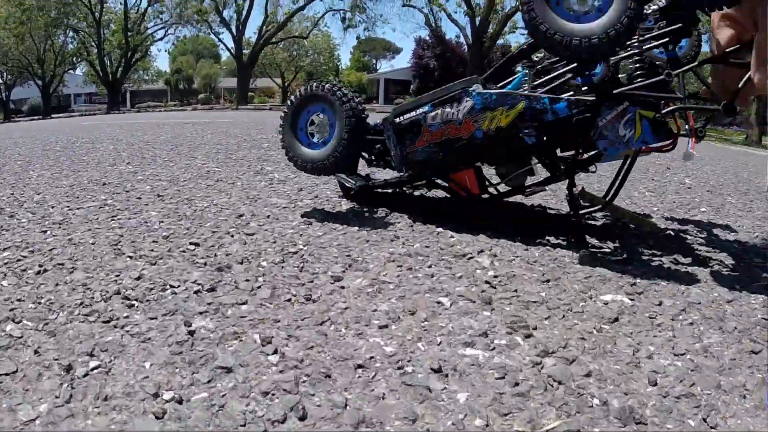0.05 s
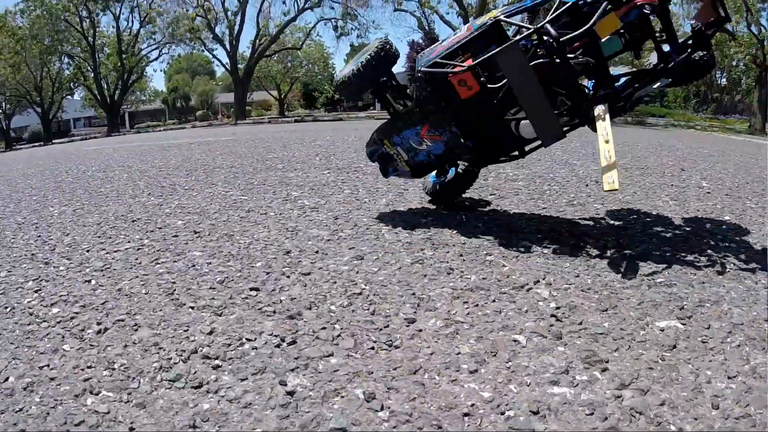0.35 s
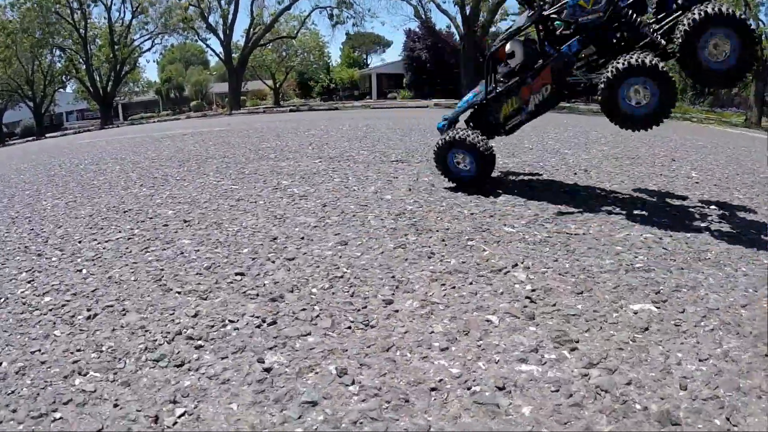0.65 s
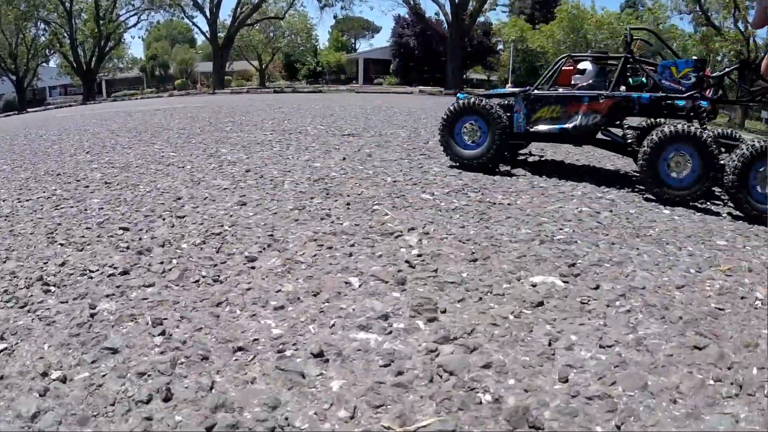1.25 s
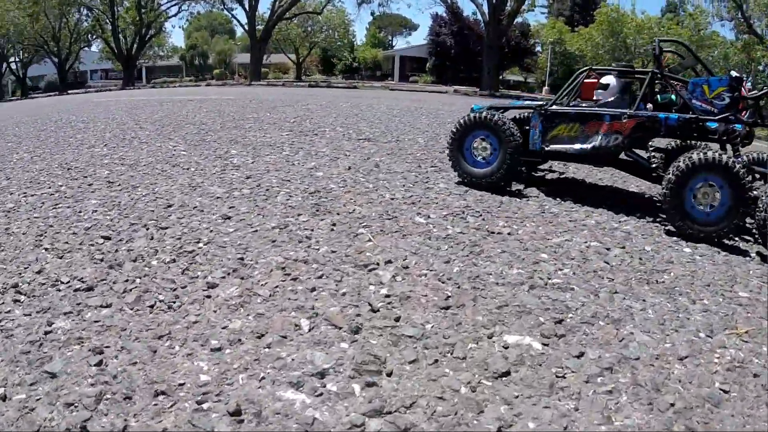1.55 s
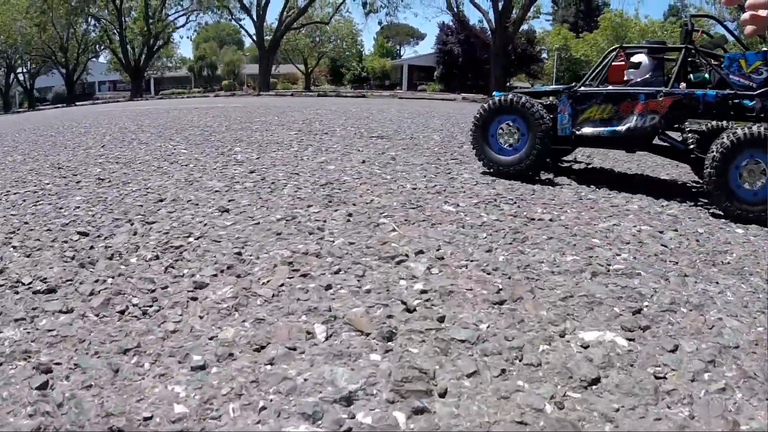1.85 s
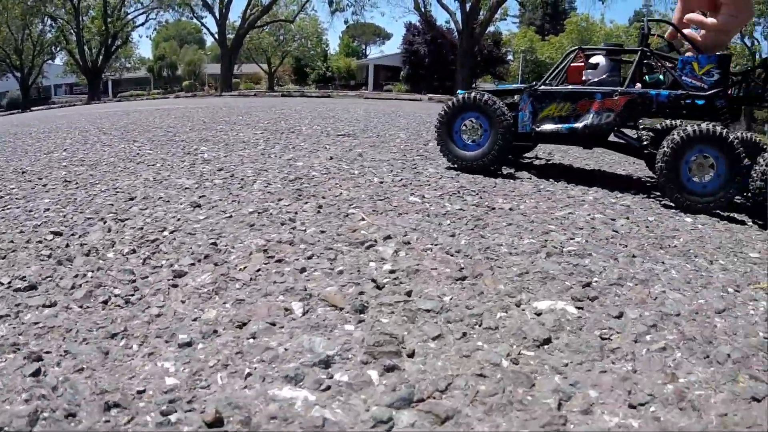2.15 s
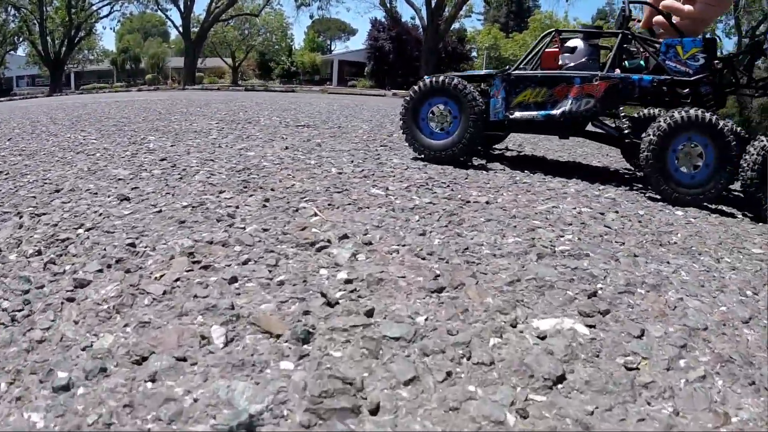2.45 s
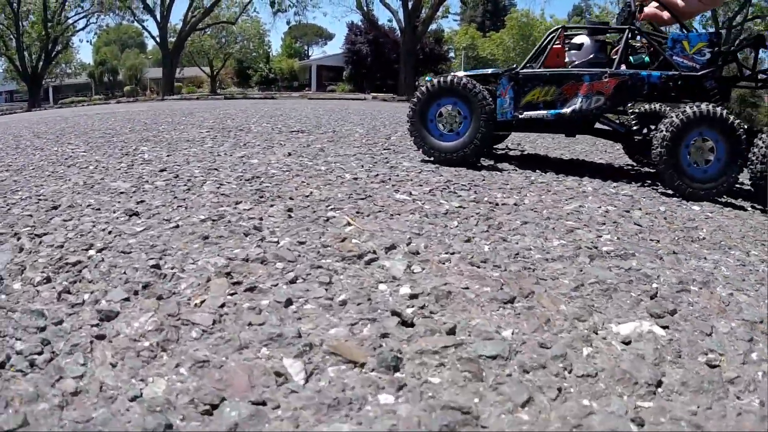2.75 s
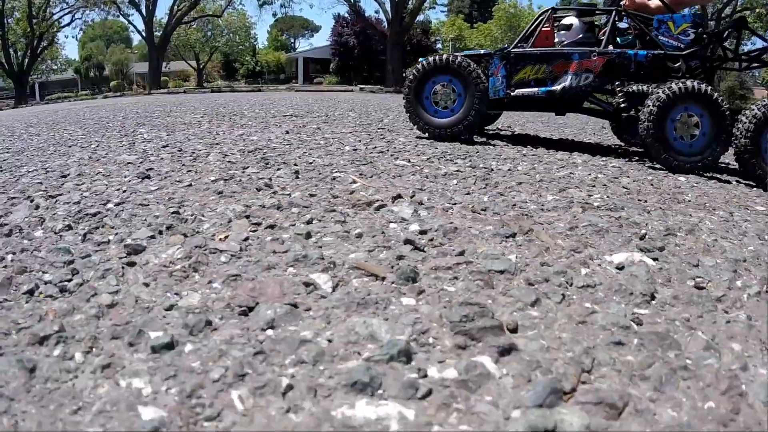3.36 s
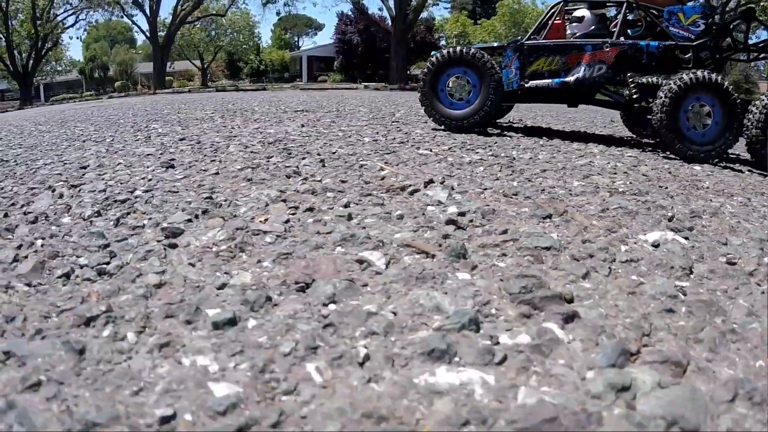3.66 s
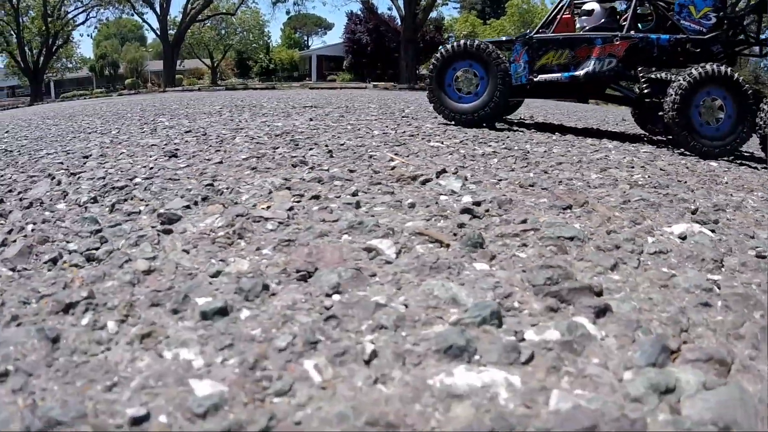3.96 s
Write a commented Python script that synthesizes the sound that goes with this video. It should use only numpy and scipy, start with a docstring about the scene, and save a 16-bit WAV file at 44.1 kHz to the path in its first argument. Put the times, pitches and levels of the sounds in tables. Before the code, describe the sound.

Close to a microphone on the ground outdoors, a toy truck knocks and rattles off its roof, lands on its wheels and crunches on grit. After one dull thump, easing wind and far street traffic remain.

```python
"""Outdoors on asphalt, microphone on a camera at ground level, a toy truck close by.
From the start, wind rumbles at the microphone over the steady wash of distant traffic.
The truck is dragged off its roof and turned over: its plastic body clatters, loose parts rattle.
Set on its wheels, it crunches on grit, and the suspension ticks as it settles. One dull thump
follows at 1.7 s; then a far car passes, and the truck gives a few last faint rubs and ticks."""
import sys
import numpy as np
from scipy import signal
from scipy.io import wavfile
from scipy.ndimage import uniform_filter1d

SR = 44100
rng = np.random.default_rng(int(sys.argv[2]) if len(sys.argv) > 2 else 0)


def to_wav(s):
    """Save 16-bit WAV."""
    ch = np.atleast_2d(s).T  # columns
    pcm = np.round(np.clip(ch, -1, 1) * 32767)  # PCM
    wavfile.write(sys.argv[1], SR, pcm.astype(np.int16))


N = 176400
T = np.arange(N) / SR
RING_T = T[:SR // 6]

# Far off: street drone, street wash, a car's tyre hum (frequency [Hz], relative density [dB])
DRONE_SPECTRUM = [(60, -36), (105, -35), (140, -3.5), (175, -1), (240, -3), (320, -12), (550, -21.5),
                  (15000, -120)]
WASH_SPECTRUM = [(200, -12.5), (400, -2.5), (600, -1.5), (1000, -1.5), (1500, -7), (2200, -16.5),
                 (3200, -24.5), (5200, -35), (8500, -35.5), (12000, -44.5), (15000, -52)]
CAR_SPECTRUM = [(520, -26.5), (840, 0), (1070, -2), (3200, -50.5)]
# Swell of the drone (time [s], level [dB])
DRONE_SWELL = [(0, -31), (1, -32), (1.9, -28), (3.2, -32.5)]
# Wind at the microphone (frequency [Hz], relative density [dB])
WIND_SPECTRUM = [(10, -34), (22, -3.5), (38, -1.5), (78, -1.5), (120, -5.5), (250, -18), (600, -23),
                 (15000, -110)]
# Its gusts (time [s], level [dB])
WIND_GUSTS = [(0, -24.5), (.27, -22), (.4, -27), (.6, -27.5), (.9, -32), (1.7, -35.5), (2.2, -32),
              (2.8, -38), (3.6, -49), (4, -40.5)]
# Dull bumps carried to the camera (time [s], level [dB], half width of the push [s])
CAMERA_BUMPS = [(0.2547, -15, 0.0016), (0.8635, -18, 0.00082), (1.7, -4.5, 0.00078), (1.718, -17.5, 0.0014)]
# Modes of the camera mount (frequency [Hz], relative level [dB], t60 [s])
MOUNT_MODES = [(115, -6, 0.029), (210, -8.5, .04), (506, -12, 0.014), (2320, -15, 0.0088)]
# Grit crushed on asphalt (frequency [Hz], relative level [dB])
GRIT_SPECTRUM = [(500, 9), (1500, 9.5), (2400, 3), (3050, 2), (4300, -3.5), (5200, -3.5), (6100, -4.5),
                 (7100, -8), (9300, -13.5), (12000, -17), (15000, -34.5)]
# Body and tyres rubbing on the road (start [s], length [s], level [dB], tilt [dB per octave])
ROAD_RUBS = [(0, 0.29, -35, -2), (0.067, 0.016, -20.5, 1.5), (0.088, 0.07, -34, -0.5),
             (0.418, 0.28, -37.5, -2), (0.774, 0.043, -35.5, 0), (0.769, 0.3, -34.5, -3.5),
             (1.174, 0.16, -31, -5.5), (1.252, 0.017, -33, 1.5), (2.726, 0.18, -50, -1),
             (3.662, 0.44, -52, -3)]
# Modes of the links, springs and shocks (frequency [Hz], relative level [dB], t60 [s])
SUSPENSION_MODES = [(2230, -1, 0.0089), (2840, 0.5, 0.01), (3010, -8, 0.01), (5710, -1, 0.01),
                    (6090, 2.5, 0.0091), (9080, 1.5, 0.0037), (10500, -5, 0.0055), (13700, -16, .004)]
# Ticks of those parts (time [s], level [dB])
SUSPENSION_TICKS = [(.063, -31), (0.0702, -12), (0.087, -22), (.110, -20), (0.126, -21), (0.1473, -24),
                    (0.5845, -24), (.6702, -24.5), (0.702, -24.5), (0.8453, -24), (0.864, -22.5),
                    (0.9154, -30), (1.223, -21.5), (1.2235, -21), (1.2674, -15.5), (1.2835, -23),
                    (1.291, -25), (1.2995, -17), (1.311, -21), (1.3362, -23), (1.3413, -18.5),
                    (1.3698, -23.5), (3.7, -42)]
# Modes of the plastic body and cage (frequency [Hz], relative level [dB], t60 [s])
BODY_MODES = [(473, 4.5, 0.038), (830, 2.5, 0.013), (1206, -4.5, 0.015), (1420, -18, 0.042),
              (1640, 1.5, 0.013), (1980, -1.5, 0.018), (2550, -1.5, 0.014), (3090, -2, 0.0081),
              (3330, -18, 0.012), (3600, -18, 0.019), (4100, -9, 0.017), (5010, 2.5, 0.0076),
              (5920, -1.5, 0.015)]
# Loose chassis rattling (start [s], end [s], tap rate [1/s], strength [dB], mode centre [Hz])
CHASSIS_RATTLES = [(.46, 0.849, 85, -31.5, 3600), (1.202, 1.349, 200, -27.5, 2150)]
# Body on the road (time [s], strength [dB], mode centre [Hz], spread [octaves], ring length [factor])
BODY_KNOCKS = [(0.017, -10, 2160, 1, 0.83), (0.0566, -7, 1250, 1.23, 0.97), (0.0696, -9.5, 4350, 0.5, 1.1),
               (0.0790, -14, 3570, 0.53, 1), (0.11, -7, 1373, 0.17, 1.2), (.1150, -10, 1540, 0.091, .8),
               (0.1177, -10.5, 1353, 0.16, 1.85), (0.1859, -1.5, 2120, 1.11, 0.73),
               (0.2258, -3, 1350, 0.5, 0.75), (0.4629, -20.5, 3200, 0.43, 1), (0.5, -25, 3060, 0.3, 1.9),
               (0.5446, -20, 3600, 0.42, 0.76), (0.631, -17.5, 4540, 0.17, 0.77),
               (0.6697, -8.5, 3100, 0.17, 0.76), (0.845, -17, 3100, 0.11, 1.2),
               (0.8634, 1.5, 1000, 0.52, 0.45), (2.8155, -37, 4800, 0.47, 0.84)]

STREET_PATCH_DB, WIND_PATCH_DB = 1.45, 2.5
WASH_DB, CAR_DB, CAR_NEAREST_S, CAR_PASS_S = -36, -36.5, 2.4, 0.92
MOUNT_RING_S, MOUNT_RING_DB, CLICK_S, CLICK_DB = 1.7033, -6, 1.8, -22
GRIT_PER_S, GRIT_SPREAD_DB, GRAIN_S, RUB_FADE_SHARE = 450, 5.5, 0.00047, 0.3
TICK_DETUNE, TICK_VARY_DB, SNAP_DB = 0.012, 2, -7
CHATTER_START_S, CHATTER_END_S, CHATTER_PER_S, CHATTER_DB = 1.23, 1.36, 200, -34.5
RATTLE_VARY_DB, RATTLE_VARY_OCTAVES = 6.5, 0.8
CONTACT_CYCLES = 0.39  # in cycles of the mode centre: a duller knock has a longer contact
ECHO_DB, ECHO_T60_S = -13, 0.1
DC_OFFSET, BAND_LIMIT_HZ = 0.011, 15500


def amp(db):
    """Decibels to gain."""
    return 10 ** (np.asarray(db) / 20)


def unit(x):
    """Scales to rms 1."""
    return x / np.sqrt(np.mean(x ** 2) + 1e-20)


def level_at(spectrum, hz):
    """Reads a spectrum in dB on a log-frequency axis."""
    frequencies, db = np.transpose(spectrum)
    return np.interp(np.log(hz + 1), np.log(frequencies), db)


def swell(points):
    """Gain over time from (time [s], level [dB]) points."""
    return amp(np.interp(T, *np.transpose(points)))


def add(mix, start_s, sound):
    """Mixes a sound in at a time."""
    part = mix[max(round(start_s * SR), 0):][:len(sound)]
    part += sound[:len(part)]


def colour(x, spectrum, tilt_db=0):
    """Minimum-phase filter of unit energy with the given spectrum and tilt per octave."""
    hz = abs(np.fft.fftfreq(2048, 1 / SR))
    tilt = tilt_db * np.log2(np.maximum(hz, spectrum[0][0]))
    log_gain = np.log(amp(level_at(spectrum, hz) + tilt))
    response = np.exp(np.conj(signal.hilbert(log_gain)))
    taps = np.fft.ifft(response).real[:len(hz) // 2]
    return signal.fftconvolve(x, taps / np.linalg.norm(taps))[:len(x)]


def ring(hz, gains, t60, rise_s):
    """Modes struck together and dying away."""
    waves = np.sin(2 * np.pi * hz[:, None] * RING_T) * np.exp(-np.log(1000) * RING_T / t60[:, None])
    return gains @ waves / np.linalg.norm(gains) * (1 - np.exp(-RING_T / rise_s))


def drifting_noise(spectrum, patch_db, patch_bins=12):
    """Shaped noise whose level drifts in patches of time and frequency."""
    hz = np.fft.rfftfreq(4096, 1 / SR)
    real, imag, patches = rng.standard_normal((3, N // 1024 + 5, len(hz)))
    patches = uniform_filter1d(patches, size=4, axis=0)
    patches = unit(uniform_filter1d(patches, size=patch_bins, axis=1))
    frames = (real + 1j * imag) * amp(level_at(spectrum, hz) + patch_db * patches)
    return unit(signal.istft(frames.T, nperseg=4096, noverlap=3072)[1][:N])


def street():
    """Distant traffic: a low drone, a steady wash, and the tyre hum of a far car passing."""
    drone = drifting_noise(DRONE_SPECTRUM, STREET_PATCH_DB) * swell(DRONE_SWELL)
    wash = drifting_noise(WASH_SPECTRUM, STREET_PATCH_DB, patch_bins=30) * amp(WASH_DB)
    relative_distance = np.hypot(1, (T - CAR_NEAREST_S) / CAR_PASS_S)
    car = drifting_noise(CAR_SPECTRUM, STREET_PATCH_DB) * amp(CAR_DB) / relative_distance
    return drone + wash + car


def wind():
    """Low buffeting right at the microphone, easing off unevenly."""
    return drifting_noise(WIND_SPECTRUM, WIND_PATCH_DB) * swell(WIND_GUSTS)


def grit_crack(decay_s, tilt_db=0):
    """A short burst of crushed grit at a contact."""
    burst = rng.standard_normal(len(RING_T)) * np.exp(-RING_T / decay_s)
    return colour(burst, GRIT_SPECTRUM, tilt_db)


def camera_bumps():
    """Soft pushes and pulls of air; the mount rings low after the biggest, then comes a small click."""
    out = np.zeros(N)
    for s, level, width in CAMERA_BUMPS:
        u = (T - s) / width
        out -= amp(level) * u * np.exp((1 - u ** 2) / 2)
    hz, db, t60 = np.transpose(MOUNT_MODES)
    add(out, MOUNT_RING_S, amp(MOUNT_RING_DB) * ring(hz, amp(db), t60, rise_s=0.00029))
    add(out, CLICK_S, amp(CLICK_DB) * grit_crack(decay_s=0.0008, tilt_db=0.5))
    return out


def road_rubs():
    """Tiny slips over stones, each stone with its own colour, swelling and fading with the stroke."""
    out, t = np.zeros(N), RING_T[:SR // 200]
    stones = rng.standard_normal((16, len(t))) * t / GRAIN_S * np.exp(-t / GRAIN_S)
    slipping = rng.random(N) < GRIT_PER_S / SR
    slips = slipping * amp(GRIT_SPREAD_DB * np.minimum(rng.exponential(1, N), 3))
    stone_hit = rng.integers(len(stones), size=N)
    crunch = sum(signal.oaconvolve(slips * (stone_hit == k), stone)[:N] for k, stone in enumerate(stones))
    for start, length, level, tilt in ROAD_RUBS:
        progress = np.arange(0, length, 1 / SR) / length
        stroke = np.minimum(np.minimum(progress, 1 - progress) / RUB_FADE_SHARE, 1)
        grains = np.roll(crunch, rng.integers(N))[:len(progress)]
        add(out, start, amp(level) * unit(colour(grains, GRIT_SPECTRUM, tilt)) * stroke)
    return out


def suspension_ticks():
    """Links and springs slip with a snap; the shocks stick and slip as they take the weight."""
    out = np.zeros(N)
    hz, db, t60 = np.transpose(SUSPENSION_MODES)
    settling = (T > CHATTER_START_S) & (T < CHATTER_END_S)
    slip_times = T[(rng.random(N) < CHATTER_PER_S / SR) & settling]
    for s, level in SUSPENSION_TICKS + [(s, CHATTER_DB) for s in slip_times]:
        detune, weight = rng.standard_normal((2, len(hz)))
        tone = ring(hz * (1 + TICK_DETUNE * detune), amp(db + TICK_VARY_DB * weight), t60, rise_s=0.00028)
        snap = amp(SNAP_DB) * grit_crack(decay_s=0.00084)
        add(out, s, amp(level) * (tone + snap))
    return out


def knock(centre_hz, spread_octaves, ring_factor):
    """Rings the body modes that the point of contact favours, softened by the length of the contact."""
    hz, db, t60 = np.transpose(BODY_MODES)
    favoured = np.exp(-0.5 * (np.log2(hz / centre_hz) / spread_octaves) ** 2)
    gains = amp(db) * favoured * rng.choice([-1, 1], len(hz))
    force = np.sin(np.pi * np.minimum(RING_T[:SR // 200] * centre_hz / CONTACT_CYCLES, 1)) ** 2
    return np.convolve(ring(hz, gains, t60 * ring_factor, rise_s=0.00026), force / force.sum())


def body_clatter():
    """Close up, the body strikes the road and loose parts rattle unevenly at changing contact points."""
    out = np.zeros(N)
    for s, level, centre, spread, ring_factor in BODY_KNOCKS:
        add(out, s, amp(level) * knock(centre, spread, ring_factor))
    for start, end, rate, level, centre in CHASSIS_RATTLES:
        for s in np.arange(start, end, 1 / rate):
            late, strength, place = rng.uniform(-1, 1, 3)
            tap = knock(centre * 2 ** (RATTLE_VARY_OCTAVES * place), spread_octaves=0.14, ring_factor=0.67)
            add(out, s + late / rate, amp(level + RATTLE_VARY_DB * strength) * tap)
    return out


def with_reflections(direct):
    """Adds faint short reflections from the road and the truck itself."""
    tail = rng.standard_normal(len(RING_T)) * np.exp(-np.log(1000) * RING_T / ECHO_T60_S)
    return direct + amp(ECHO_DB) * signal.fftconvolve(direct, tail / np.linalg.norm(tail))[:N]


def scene():
    """Wind, far street and close truck at one microphone on the ground."""
    background = wind() + street()
    bumps = camera_bumps()
    truck = body_clatter() + road_rubs() + suspension_ticks()
    return (background + bumps + with_reflections(truck))[None]


def record(dry):
    """The recorder adds a slight steady offset and cuts the top treble."""
    lowpass = signal.firwin(301, BAND_LIMIT_HZ, window=("kaiser", 9), fs=SR)
    return signal.oaconvolve(dry + DC_OFFSET, lowpass[None], "same")


dry = scene()
out = record(dry)
to_wav(out)
```